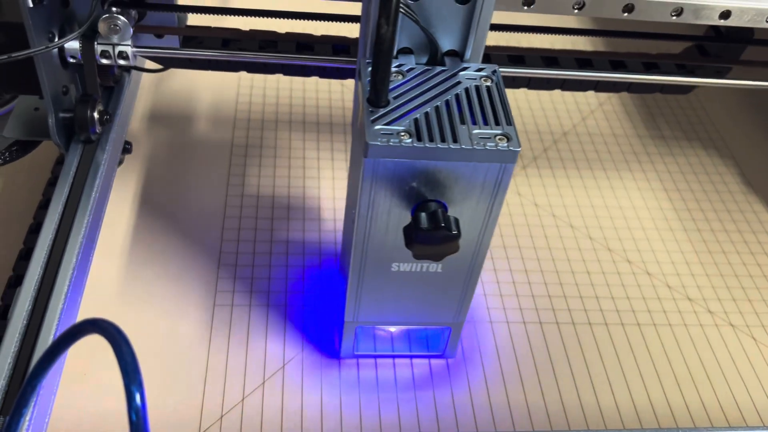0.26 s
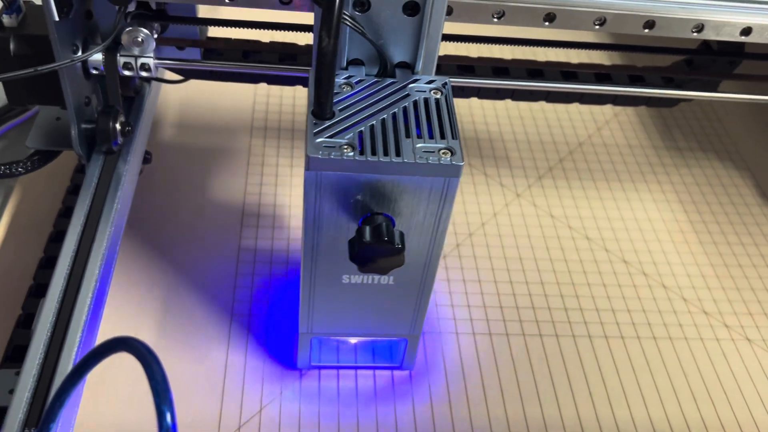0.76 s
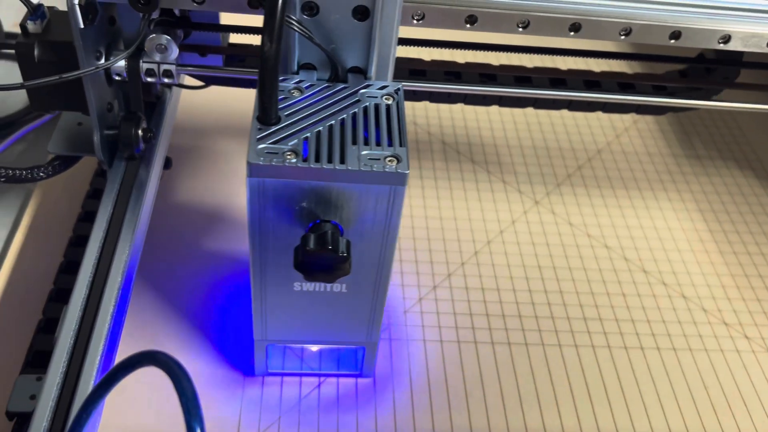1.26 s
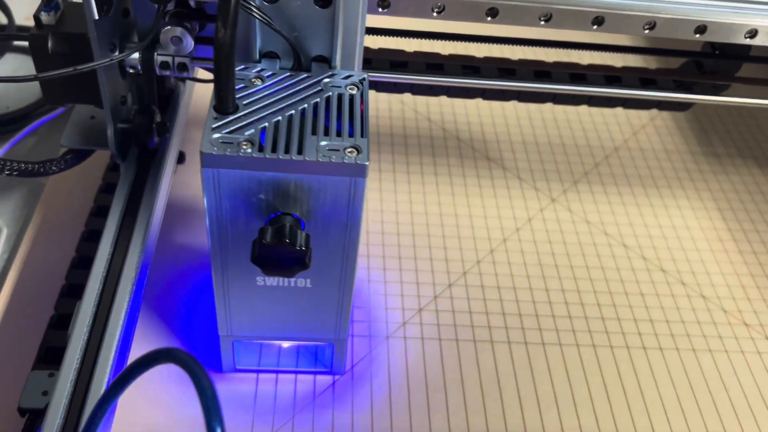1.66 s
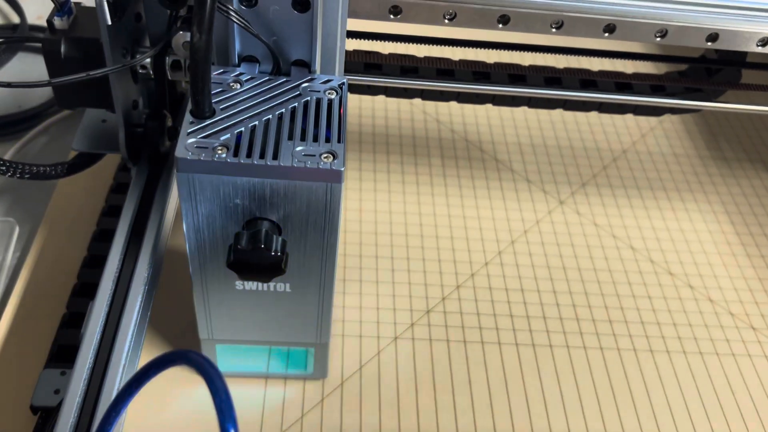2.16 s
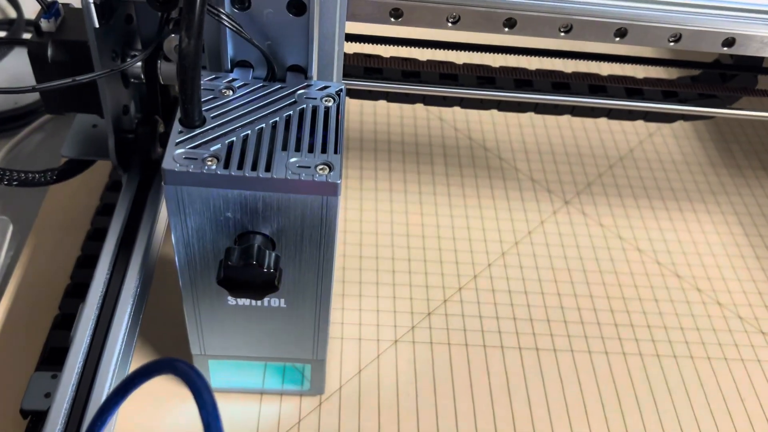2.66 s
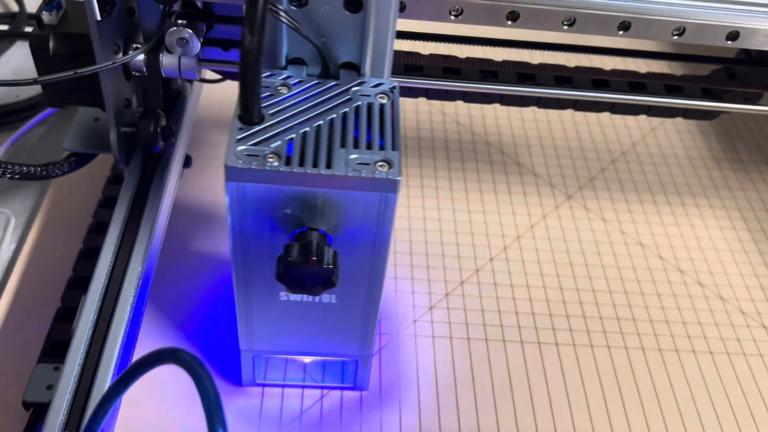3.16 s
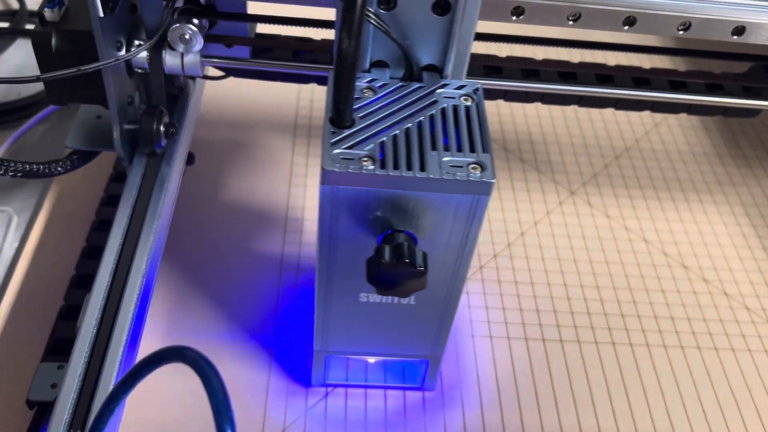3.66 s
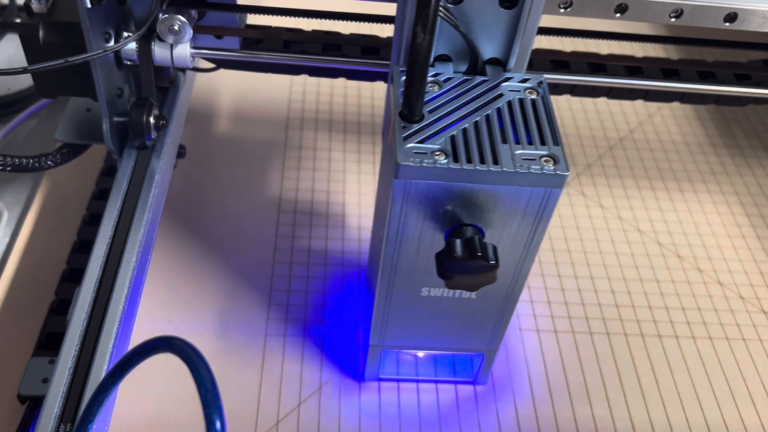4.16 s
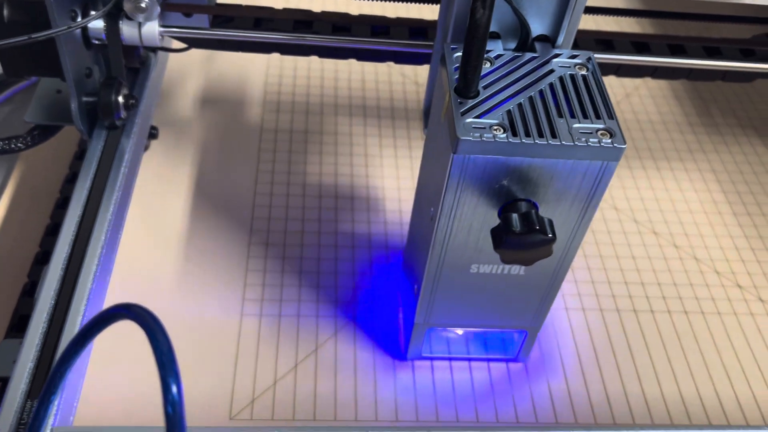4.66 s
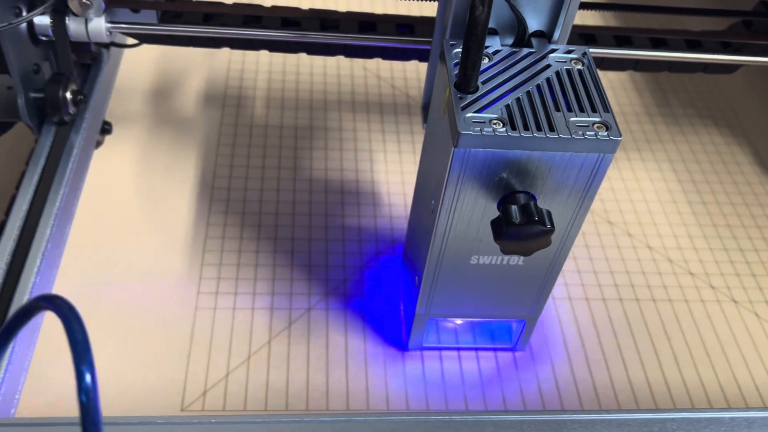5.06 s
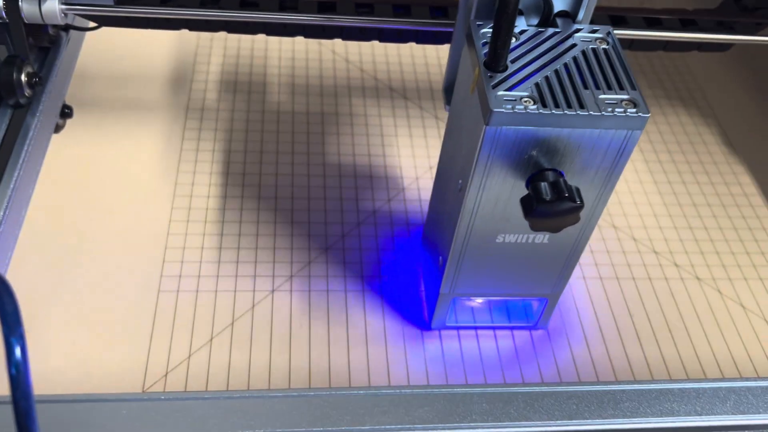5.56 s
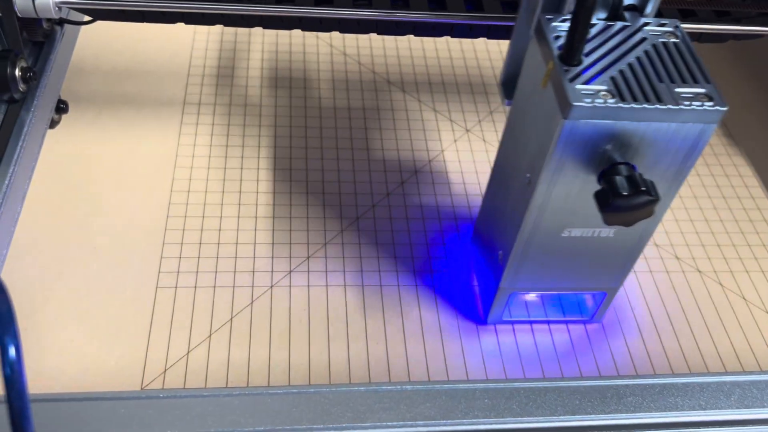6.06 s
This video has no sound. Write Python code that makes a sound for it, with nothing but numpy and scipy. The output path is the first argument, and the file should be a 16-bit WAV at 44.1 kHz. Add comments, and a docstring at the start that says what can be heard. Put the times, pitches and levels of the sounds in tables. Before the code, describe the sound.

From 0 seconds a laser engraver runs close to a stereo microphone: a dense, slightly fluttering air rush, a strong fan tone around 1240 hertz, a steady 1000 hertz electronic whine with fainter overtones, and a thin whistle near 5 kilohertz. Underneath lie mains pump hum, a blower's low hum and a deep throb that swells around 0.7 seconds, later fading. The head moves left, gradually changing the hiss and balance. At about 1.85 the whine and whistle cut quickly; the fan tone weakens and creeps up in pitch. A stepper motor spins up to a low buzzing hum, holds, and slows to silence by 2.9. From 2.8 the whine swells back within 0.2 seconds and the fan tone settles down to its former pitch. The head then travels right, the whine growing stronger and the tones shifting in stereo, continuing unbroken until the end at 6.3 seconds.

```python
"""Air rushes through the fan of a laser engraver's head, under a whine, a thin whistle and low hums.
The head slides to the left end of its rail and returns past its start; the beam rests near that end
while a stepping motor sounds. The air is shaped noise, all other sources are sines or narrow noise.
Colour, level and stereo image follow the head's place before a pair of microphone ports."""
import sys
import numpy as np
from scipy import signal
from scipy.io import wavfile
from scipy.ndimage import uniform_filter1d

SR = 44100
rng = np.random.default_rng(int(sys.argv[2]) if len(sys.argv) > 2 else 0)


def file_out(sig):
    """Save sig as 16-bit WAV at sys.argv[1]."""
    # one column per channel
    cols = np.atleast_2d(sig).T
    # limit, then scale
    lim = np.clip(cols, -1, 1)
    pcm = np.round(lim * 32767).astype(np.int16)
    wavfile.write(sys.argv[1], SR, pcm)


N = 279153

# The head's travel. Each row: time in seconds, place on the rail (1 left end, 0 and less far right).
HEAD_TRAVEL = [(0, 0.1), (1.8, 0.81), (2.9, 1), (4.2, 0.085), (4.7, 0.0033), (6.33, -0.61)]
# A single sine. Each row: multiple of the pitch, level in dB.
SINGLE_SINE = [(1, 0)]
PUMP_HZ = 60  # the mains frequency


def gain_of(db):
    """Decibels to gain."""
    return 10 ** (np.asarray(db) / 20)


def evened(x):
    """Scales to an rms of 1."""
    return x / np.sqrt(np.mean(x ** 2) + 1e-20)


def seconds():
    """The time of every sample."""
    return np.arange(N) / SR


def columns(rows, at):
    """Every column after the first, read at the given times, places or frequencies."""
    key, *rest = np.transpose(rows)
    return [np.interp(at, key, column) for column in rest]


def heard(rows):
    """Level, balance and lead of a tone as the head travels."""
    return columns(rows, columns(HEAD_TRAVEL, seconds())[0])


def between(start_s, end_s, ramp_s):
    """Rises from 0 to 1 after the start, holds, and is back at 0 at the end."""
    t = seconds()
    return np.clip(np.minimum(t - start_s, end_s - t) / ramp_s, 0, 1)


def wander(per_s):
    """Slow random drift of rms about 1: sines up to per_s Hz, the slower ones stronger."""
    t = np.arange(0, N + 256, 256) / SR
    rates = per_s * np.geomspace(.05, 1, num=16)
    slow = sum(np.sin(2 * np.pi * (f * t + rng.random())) / np.sqrt(f) for f in rates)
    return np.interp(seconds(), t, evened(slow))


def stack(hz, orders, pan_db, lead, waver_db):
    """Wavering sines on multiples of a pitch; the left port is pan_db louder and leads by `lead` radians."""
    phase = 2 * np.pi * np.cumsum(hz * np.ones(N)) / SR
    side = np.array([[.5], [-.5]])  # left, right
    tones = 0
    for multiple, db in orders:
        level = gain_of(db + waver_db * wander(per_s=6))
        start = 2 * np.pi * rng.random()
        tones = tones + level * np.sin(multiple * phase + start + lead * side)
    return np.sqrt(2) * gain_of(pan_db * side) * tones


def beam_on():
    """1 while the beam burns, 0 while it rests: it cuts quickly and swells back."""
    off_s, fade_s, on_s, swell_s = 1.84, .07, 2.78, .21
    t = seconds()
    return np.clip(np.maximum(1 - (t - off_s) / fade_s, (t - on_s) / swell_s), 0, 1)


def uncancelled():
    """Gain of 1 with set dips where motor tone and hum cancel as the motor passes the hum's pitch."""
    dips_s, length_s, depth = [1.96, 2.84], .05, .8
    t = seconds()
    return 1 - depth * sum(np.exp(-((t - s) / length_s) ** 2) for s in dips_s)


def treble_stereo(hz):
    """Stereo of the treble: bands in phase or opposed by turns between left and right, less alike at changes."""
    # Each row: centre of the change in Hz, width in Hz, likeness of left and right there (0-1).
    phase_steps = [(8600, 800, .6), (10650, 800, .5), (12700, 800, .5), (14400, 1200, .7)]
    same, lead = 1, 0
    for centre, width, likeness in phase_steps:
        step = np.clip((hz - centre) / width + .5, 0, 1)
        same = same - (1 - likeness) * np.sin(np.pi * step) ** 2
        lead = lead - np.pi * step
    return same, lead


def air(patchy_db=1.03, flicker_db=2.0, ripple_db=1.42):
    """Air rush: noise whose spectrum and stereo likeness blend along the rail; the top hiss flickers."""
    # The rush through the head. Each row: frequency in Hz, level in dB per Hz before the flicker at the
    # left and right port with the head left, the same two with it right, the same two with it far right.
    rush = [(634, -70.5, -71, -71, -70.5, -72, -71), (700.0, -66.5, -66.5, -68.5, -67.5, -67.5, -67.0),
            (805, -62.5, -67, -61.5, -66, -66.5, -70), (903, -59.1, -65, -65, -70.7, -64, -66),
            (953, -63, -70, -68, -70, -68.2, -67), (1082, -77, -74, -58.5, -65.5, -60, -65),
            (1160, -70, -75.3, -68, -70.5, -60.5, -70), (1285, -64, -72.5, -64.6, -68, -66.5, -71.1),
            (1435, -61, -71, -63.5, -65.5, -62.5, -66), (1610, -64, -64, -62.5, -62.5, -65, -59.8),
            (1730, -78, -74, -61, -59, -66, -68), (1840, -71, -77, -77, -72, -70, -73),
            (1915, -67.5, -74, -68.7, -69, -68.9, -68.1), (2120, -65.5, -75, -64.5, -67.5, -66.7, -68),
            (2340, -66.5, -79, -65.5, -71.5, -65.5, -67), (2510, -65, -76.5, -66, -67, -65, -68),
            (2740, -65.5, -75, -70, -73, -70, -73), (3100, -71.5, -86, -72, -76, -72, -75),
            (3250.0, -67.5, -72, -73, -85, -73, -73.1), (3480.0, -69.5, -72.5, -70.5, -77.5, -73, -72),
            (3660, -66.5, -76.3, -74, -74, -77, -76), (4000, -71, -87, -70.5, -75, -71, -72),
            (4160, -67, -73, -74, -80.0, -73.6, -75), (4410, -71, -71, -83.5, -87, -80, -79),
            (4650.0, -71, -74, -78.5, -80, -83, -82.7), (4900, -64, -75, -77, -82, -81.5, -78),
            (4970.0, -67, -79, -73.5, -77.5, -77, -76.5), (5190.0, -68.5, -79, -73.5, -75.5, -78.5, -77.5),
            (5350.0, -68.5, -75, -80, -81, -81, -80), (5590, -78, -81, -77, -86.1, -80, -84),
            (5850.0, -80, -83.6, -82.5, -87, -82.6, -83.9), (6160, -76, -82, -82, -84, -83.2, -84),
            (6540.0, -75.5, -86.0, -81, -86.8, -82, -82)]
    # Treble, equally loud left and right. Each row: frequency in Hz, level in dB per Hz before the flicker
    # with the head left, with the head right.
    hiss = [(7000, -80, -81), (7460, -78.5, -76.5), (7740, -79.5, -79), (9000, -81, -81), (9500, -81, -82),
            (10100, -84, -83.5), (10900, -83.5, -83), (11650, -84.5, -84.5), (12300, -88.5, -92.5),
            (12800, -85, -88), (13500, -81, -79), (14000, -82, -82), (14500, -77, -81), (15000, -79, -83.5),
            (15600, -78, -79)]
    # The room's low noise. Each row: frequency in Hz, level in dB per Hz before the flicker
    # at the left port, at the right port.
    rumble = [(20, -95, -94), (35, -91, -89), (50, -76, -78), (75, -73, -71), (110, -75.5, -75),
              (160, -76.5, -74.5), (220, -81.5, -75.5), (300, -75.5, -76.5), (470, -73, -71.5),
              (600, -71, -71)]
    # How left and right relate below the treble. Each row: frequency in Hz, likeness (0-1) and
    # left's lead in radians with the head left, the same two with the head right.
    port_pair = [(40, 0.99, 0.22, 1, 0), (300, 0.94, 0.22, 0.86, 0.73), (675, 0.85, 0.77, 1, 0.35),
                 (980, 0.13, 0.73, 0.96, 1), (1400, 0.7, 1.0, 0.92, 0.25), (1750, 0.6, 1.3, 0.93, 0.15),
                 (2060, 0.72, 0.75, 0.93, 0.35), (2410, 0.72, 1.15, 0.93, 0.7),
                 (2750, 0.72, 0.95, 0.88, 0.75), (3100, 0.5, -0.1, 0.75, 0.45), (3440, 0.9, 0, 0.82, 0.15),
                 (3900, 0.92, 0, 0.9, 0.05), (4470, 0.92, 0, 0.77, 0.1), (4820, 0.9, 0, 0.7, 0),
                 (5260, 0.66, -0.8, 0.68, -1.5), (6100, 0.62, -0.28, 0.1, 6), (6600, 0.47, 0.45, 0.65, 0)]
    treble_hz, far_right = 6900, -.5
    frames, hz = N // 512 + 5, np.fft.rfftfreq(2048, 1 / SR)
    travel = columns(HEAD_TRAVEL, np.arange(frames) * 512 / SR)[0]
    place, beyond = np.clip(travel, 0, 1), np.clip(travel / far_right, 0, 1)

    # levels left and right for the three places of the head
    low = [(f, left, right, left, right, left, right) for f, left, right in rumble[:-1]]
    high = [(f, near, near, far, far, far, far) for f, near, far in hiss]
    levels = [c[:, None] for c in columns(low + rush + high, hz)]
    left_db, right_db, left_far_db, right_far_db, left_end_db, right_end_db = levels
    left_now_db = left_far_db + place * (left_db - left_far_db) + beyond * (left_end_db - left_far_db)
    right_now_db = right_far_db + place * (right_db - right_far_db) + beyond * (right_end_db - right_far_db)

    # likeness and lead between left and right; the treble's stay the same wherever the head is
    stereo = zip(columns(port_pair + [(treble_hz, 1, 0, 1, 0)], hz), 2 * treble_stereo(hz))
    same, lead, same_far, lead_far = (np.where(hz < treble_hz, c, treble)[:, None] for c, treble in stereo)
    same = np.clip(same_far + place * (same - same_far), 0, 1)
    lead = lead_far + place * (lead - lead_far)

    a, b, c, d, patches, ripple = rng.standard_normal((frames, len(hz), 6)).T
    # axis 0 is frequency, axis 1 is time
    patches = evened(uniform_filter1d(uniform_filter1d(patches, size=10, axis=0), size=2, axis=1))
    # reflections off bed and frame: narrow peaks and dips that drift slowly
    ripple = evened(uniform_filter1d(uniform_filter1d(ripple, size=3, axis=0), size=60, axis=1))
    depth_db = patchy_db + flicker_db * np.clip((hz[:, None] - 8000) / 5000, 0, 1)
    flicker = gain_of(depth_db * patches + ripple_db * ripple)

    first = a + 1j * b
    second = (same * first + np.sqrt(1 - same ** 2) * (c + 1j * d)) * np.exp(-1j * lead)
    spectra = np.array([first * gain_of(left_now_db), second * gain_of(right_now_db)]) * flicker
    per_hz = 1 / signal.istft(first, nperseg=2048, noverlap=1536)[1].std()
    noise = signal.istft(spectra, nperseg=2048, noverlap=1536)[1][:, :N]
    return np.sqrt(SR / 2) * per_hz * noise


def fan():
    """Blade tone and other shaft orders; it rises and weakens, with a lag, while the beam draws no power."""
    # Each row: place of the head, level in dB before the idle drop, left minus right in dB,
    # left port's lead in radians.
    fan_heard = [(-.6, -39, 10, .3), (-.3, -42, 13.5, .4), (0, -40, 6, .6), (.15, -42, 4, 0.62),
                 (.55, -40, -1.5, 1), (1, -40, -5, 0.93)]
    # Tones of the fan's frame. Each row: multiple of the shaft speed, level in dB before the idle drop.
    frame_orders = [(1, -66), (4, -60), (6, -57.5), (8, -53.5), (9, -59), (12, -58), (16, -56), (21, -62)]
    blade_hz, idle_rise_hz, waver_hz, blade_count = 1240.6, 13.5, 0.44, 7
    lag_s, idle_db = 0.24, -6
    r = np.exp(-1 / (lag_s * SR))
    idle = signal.lfilter([1 - r], [1, -r], 1 - beam_on())
    db, pan_db, lead = heard(fan_heard)
    hz = blade_hz + idle_rise_hz * idle + waver_hz * wander(per_s=4.99)
    blades = gain_of(db) * stack(hz, SINGLE_SINE, pan_db, lead, waver_db=0.6)
    frame = stack(hz / blade_count, frame_orders, pan_db=12, lead=0.57, waver_db=2.0)
    return gain_of(idle_db * idle) * (blades + frame)


def beam():
    """The power supply's switching whine with overtones and a thin whistle, all only while the beam is on."""
    # The three tables that follow the head share their columns. Each row: place of the head, level in dB
    # (the whine's before its outward drop), left minus right in dB, left port's lead in radians.
    whine_heard = [(-.6, -34.5, -2.5, .5), (-.22, -34.5, 5, .7), (.1, -35.5, 1.5, .2), (.5, -37.5, 3, .05),
                   (1, -40, 6, 0)]
    octave_heard = [(-.6, -48, -2, .1), (-.2, -47, 3, .1), (.1, -44, 6, .25), (.5, -48, 5, .3),
                    (1, -50.5, 9, .3)]
    whistle_heard = [(-.6, -70, 3, -.2), (-.35, -56, 6, -.2), (0, -57.5, 1, -.7), (.12, -51.5, 7, -.6),
                     (.4, -55, 13, -.7), (.65, -59, 8, -.6), (.85, -64, 0, -.6), (1, -60, 3, -.6)]
    # Overtones above the octave. Each row: multiple of the whine, level in dB relative to the octave.
    overtones = [(3, -20), (5, -13.5), (6, -27)]
    # Faint top, centred. Each row: multiple of the whine, level in dB relative to the octave.
    top_orders = [(11, -23), (15, -22)]
    whine_hz, whistle_hz = 1000, 5158.5
    outward_db, outward_end_s = -3.5, 2.78  # the whine is weaker on the leftward pass
    db, pan_db, lead = heard(whine_heard)
    octave_db, octave_pan_db, octave_lead = heard(octave_heard)
    whistle_db, whistle_pan_db, whistle_lead = heard(whistle_heard)
    db = db + outward_db * (seconds() < outward_end_s)
    whine = gain_of(db) * stack(whine_hz, SINGLE_SINE, pan_db, lead, waver_db=0.5)
    upper = stack(whine_hz, [(2, 0)] + overtones, octave_pan_db, octave_lead, waver_db=1.7)
    top = stack(whine_hz, top_orders, pan_db=0, lead=0, waver_db=4.0)
    whistle = stack(whistle_hz, SINGLE_SINE, whistle_pan_db, whistle_lead, waver_db=3.4)
    return beam_on() * (whine + gain_of(octave_db) * (upper + top) + gain_of(whistle_db) * whistle)


def pump():
    """Mains-driven air pump: a main hum at twice the mains, which dips twice, and other multiples."""
    # Besides the main hum. Each row: multiple of the mains, level in dB.
    pump_orders = [(1, -57), (3, -63), (4, -57.5), (7, -58.5), (11, -55)]
    hum_db = -48.5  # before the dips
    others = stack(PUMP_HZ, pump_orders, pan_db=-0.5, lead=0.092, waver_db=0.25)
    hum = stack(2 * PUMP_HZ, SINGLE_SINE, pan_db=-1.0, lead=0.085, waver_db=.5)
    return others + uncancelled() * gain_of(hum_db) * hum


def blower():
    """Exhaust blower: a steady hum on multiples of its shaft speed."""
    # Each row: multiple of the shaft speed, level in dB.
    blower_orders = [(1, -64), (4, -63), (5, -50.7), (10, -59.5)]
    return stack(49.56, blower_orders, pan_db=-1.0, lead=-0.6, waver_db=.8)


def throb():
    """A deep, drifting tone that swells, beats with the pump's mains tone and fades."""
    # Each row: time in seconds, level in dB before the swing.
    throb_levels = [(0, -67), (.7, -49), (1.1, -53), (1.9, -53), (2.4, -54), (5.1, -66), (5.6, -63),
                    (6.33, -63)]
    throb_hz, drift_hz, swing_db = 55.8, 0.37, 3
    level = gain_of(columns(throb_levels, seconds())[0] + swing_db * wander(per_s=8))
    hz = throb_hz + drift_hz * wander(per_s=3.5)
    return level * stack(hz, SINGLE_SINE, pan_db=-1, lead=0, waver_db=-2.5)


def drone():
    """Wavering low drone, centred: twice-smoothed noise moved up to a pitch."""
    # Each row: pitch in Hz, width in Hz of each smoothing, level in dB.
    drone_rows = [(168.2, 8.3, -60)]
    out = 0
    for hz, width, db in drone_rows:
        r = np.exp(-np.pi * width / SR)
        noise = rng.standard_normal((N, 2)) @ [1, 1j]
        drift = signal.lfilter([1], [1, -r], signal.lfilter([1], [1, -r], noise))
        out = out + gain_of(db) * evened((drift * np.exp(2j * np.pi * hz * seconds())).real)
    return out


def stepper():
    """The gantry motor spins up, holds its step rate and slows; its overtones fade as the move settles."""
    # Overtones. Each row: multiple of the step rate, level in dB relative to the motor's level.
    overtone_orders = [(3, -.5), (6, -5), (7, -4)]
    start_s, end_s, ramp_s = 1.86, 2.92, .19  # the motor steps to the next line
    low_hz, full_hz = 92, 135.5
    full_db, slow_db = -47, -4  # at full speed; added as the speed falls to nothing
    ends_db, settle_db_per_s = -5, -7  # the main tone is loudest mid-move; the overtones' fade
    speed = between(start_s, end_s, ramp_s)
    hz = low_hz + (full_hz - low_hz) * speed
    level = np.minimum(3 * speed, 1) * gain_of(full_db + slow_db * (1 - speed))
    mid_move = between(start_s, end_s, (end_s - start_s) / 2)
    arch = uncancelled() * gain_of(ends_db * (1 - mid_move))
    main = arch * stack(hz, SINGLE_SINE, pan_db=-3.0, lead=.1, waver_db=-1.5)
    settle = gain_of(settle_db_per_s * np.clip(seconds() - start_s, 0, 2))
    overtones = settle * stack(hz, overtone_orders, pan_db=-2.5, lead=.1, waver_db=0.7)
    return level * (main + speed ** 2 * overtones)


def scene():
    """All sources, left and right."""
    return air() + fan() + beam() + pump() + blower() + throb() + drone() + stepper()


def record(dry):
    """The band limit: a steep low-pass."""
    edge_hz = 15760
    lowpass = signal.firwin(1023, edge_hz, window=("kaiser", 9), fs=SR)
    return signal.oaconvolve(dry, lowpass[None], "same")


dry = scene()
out = record(dry)
file_out(out)
```